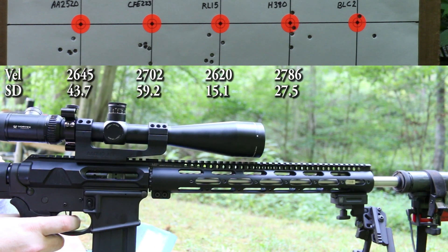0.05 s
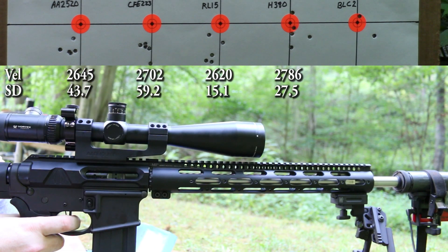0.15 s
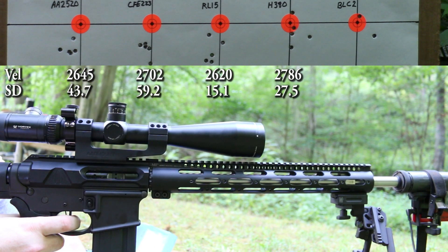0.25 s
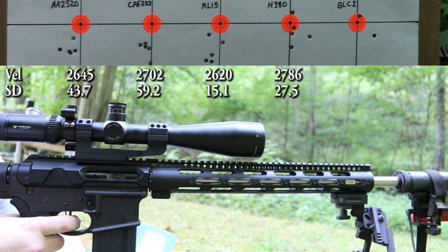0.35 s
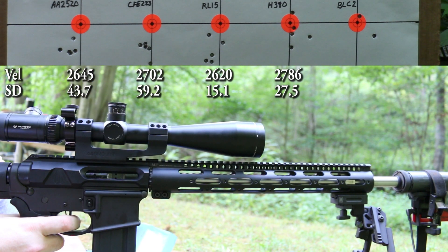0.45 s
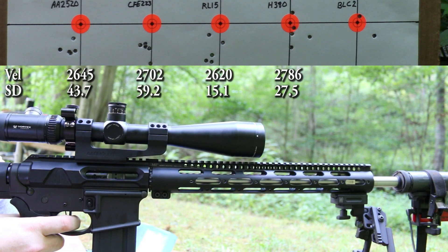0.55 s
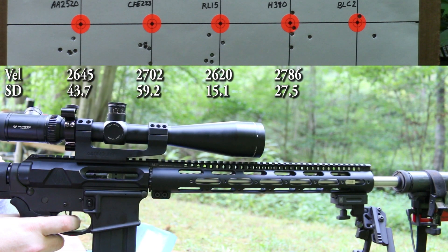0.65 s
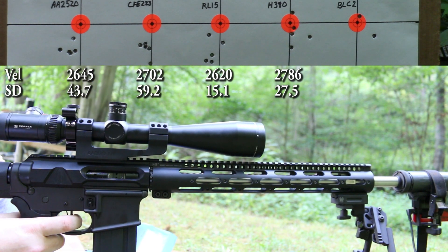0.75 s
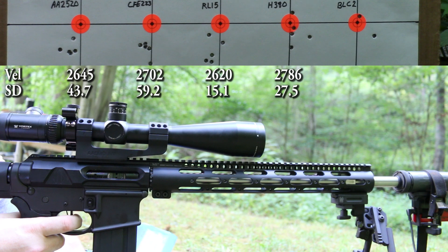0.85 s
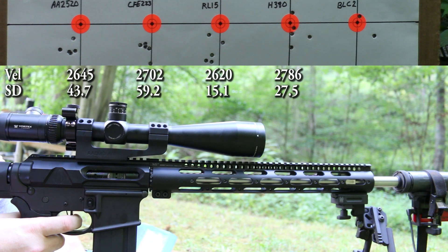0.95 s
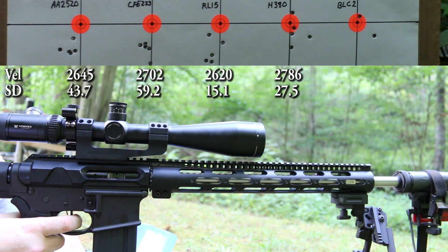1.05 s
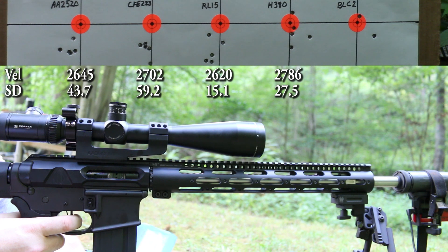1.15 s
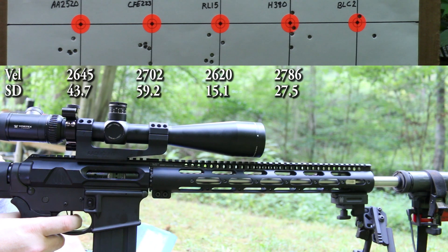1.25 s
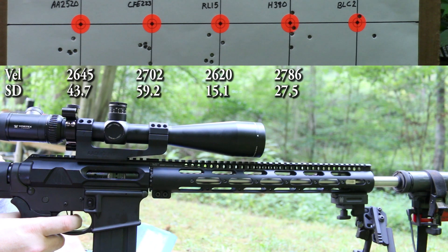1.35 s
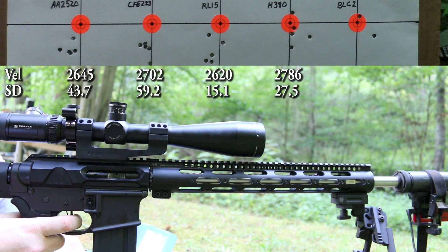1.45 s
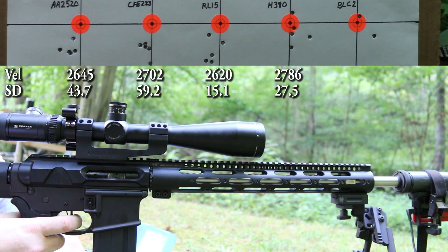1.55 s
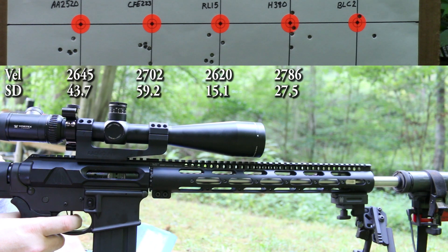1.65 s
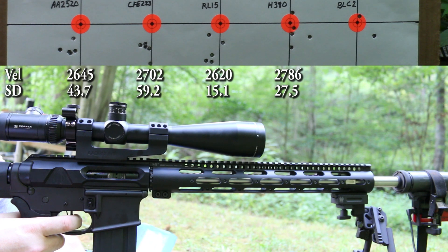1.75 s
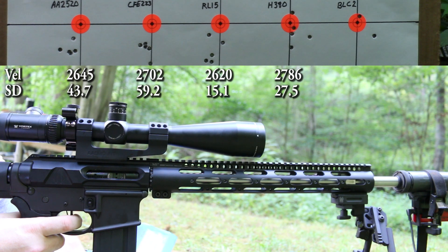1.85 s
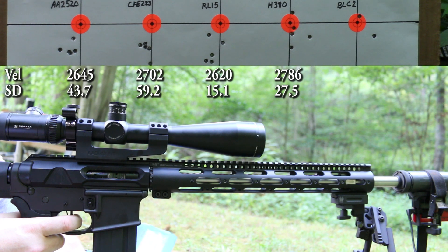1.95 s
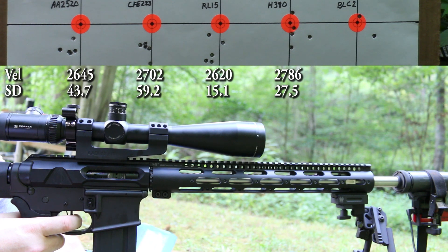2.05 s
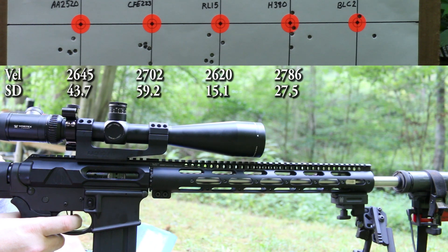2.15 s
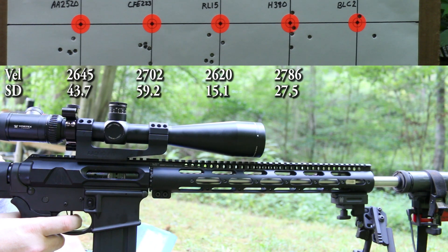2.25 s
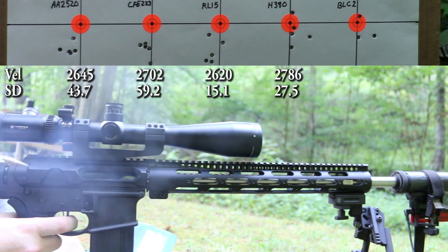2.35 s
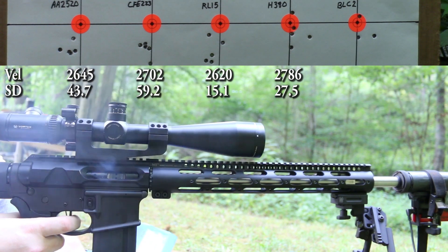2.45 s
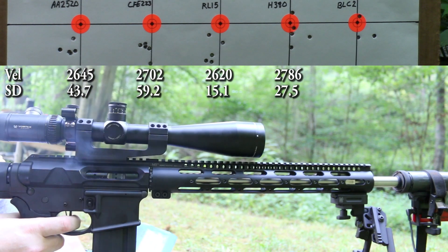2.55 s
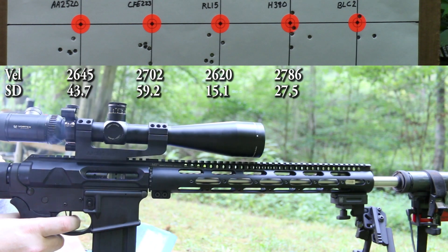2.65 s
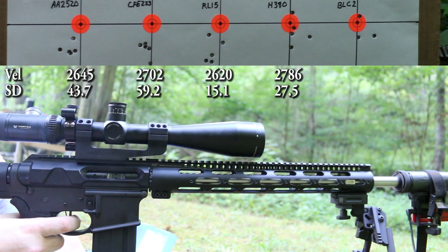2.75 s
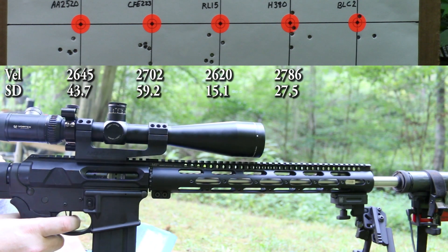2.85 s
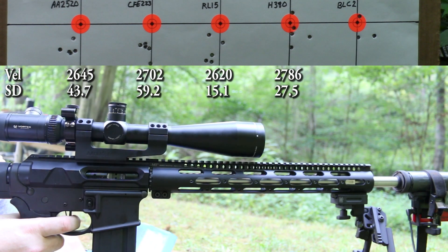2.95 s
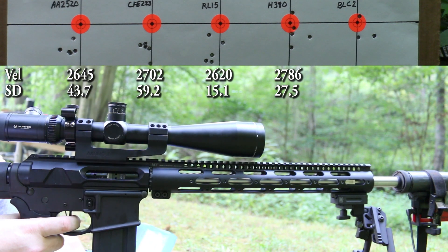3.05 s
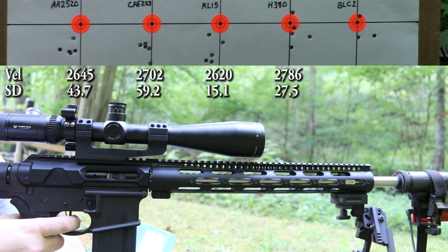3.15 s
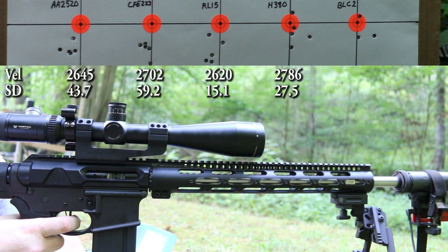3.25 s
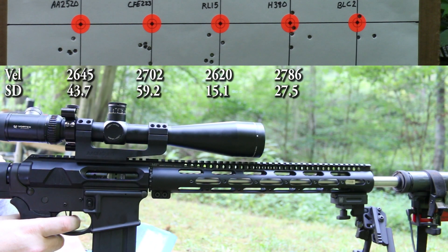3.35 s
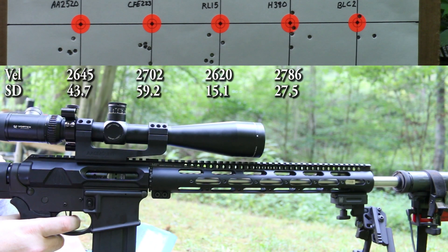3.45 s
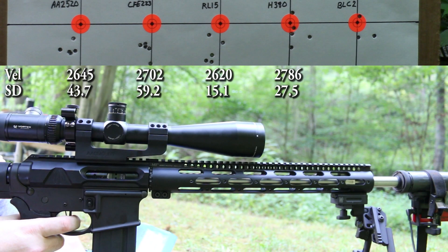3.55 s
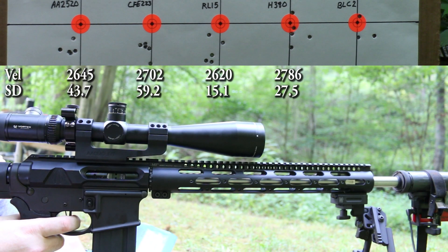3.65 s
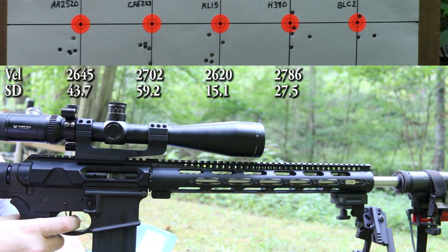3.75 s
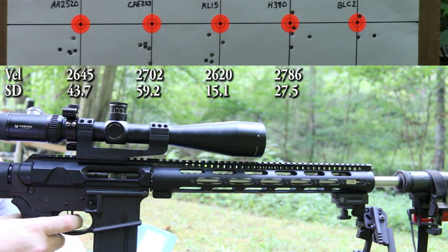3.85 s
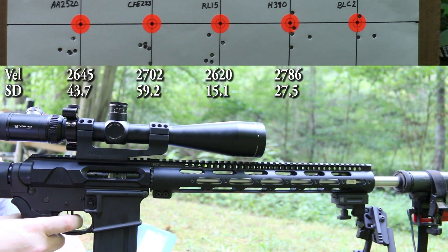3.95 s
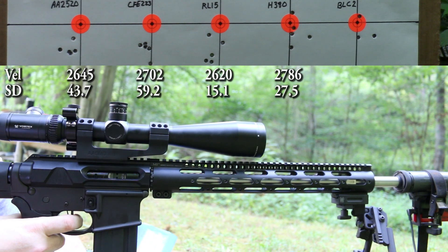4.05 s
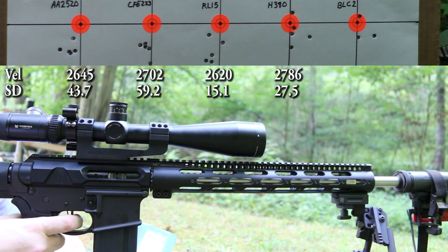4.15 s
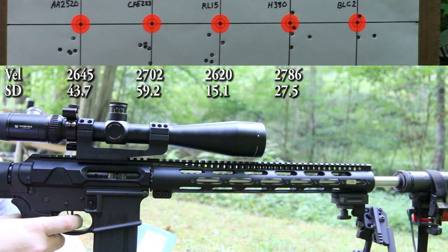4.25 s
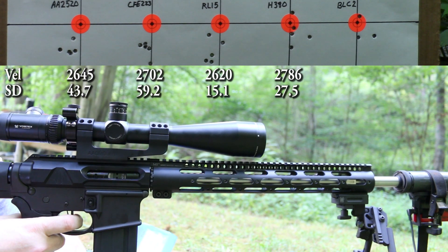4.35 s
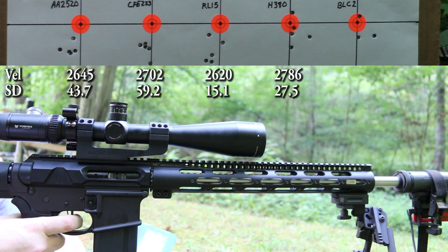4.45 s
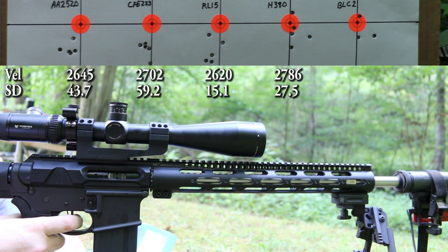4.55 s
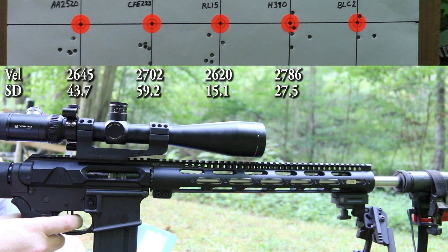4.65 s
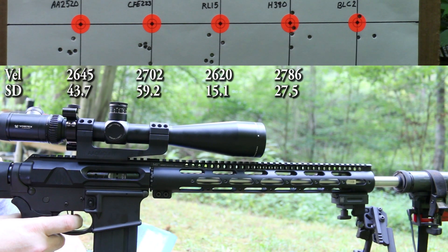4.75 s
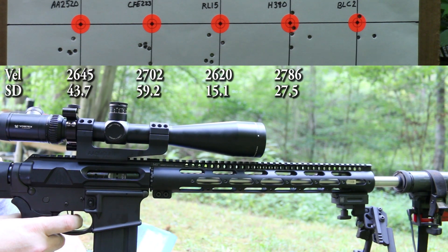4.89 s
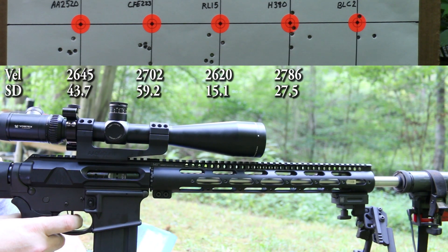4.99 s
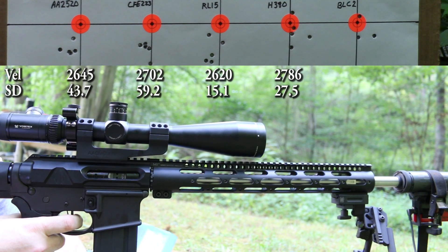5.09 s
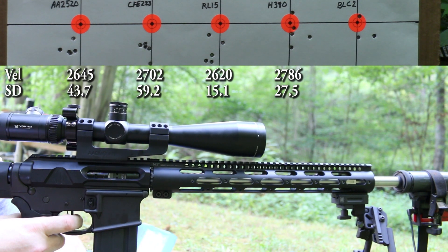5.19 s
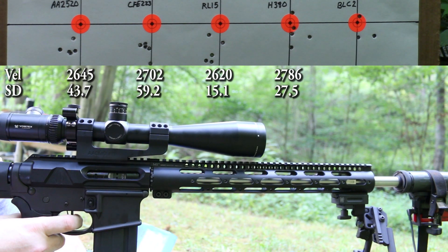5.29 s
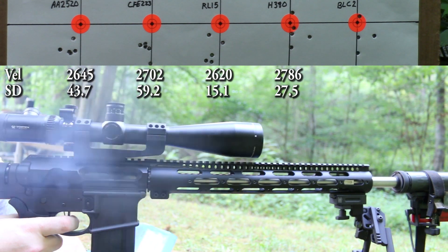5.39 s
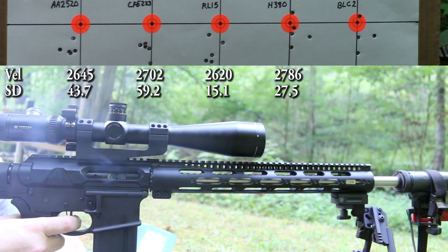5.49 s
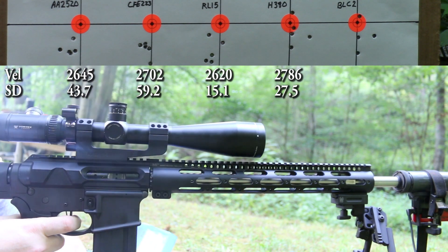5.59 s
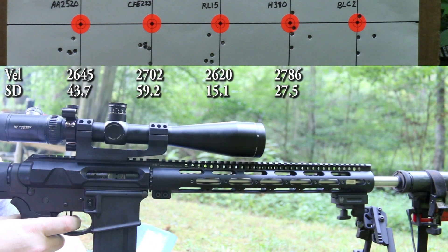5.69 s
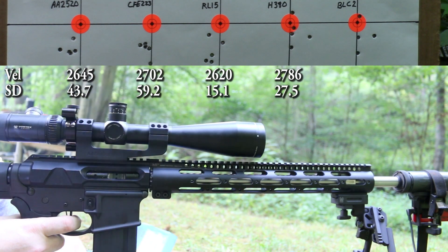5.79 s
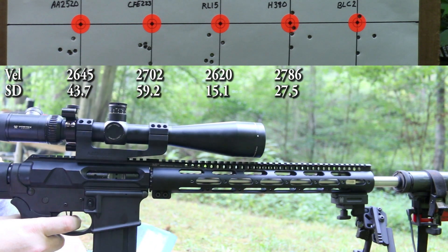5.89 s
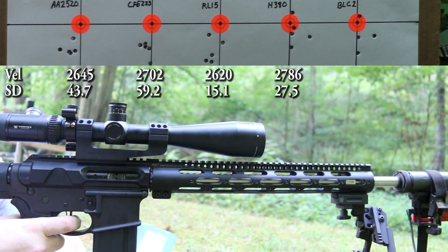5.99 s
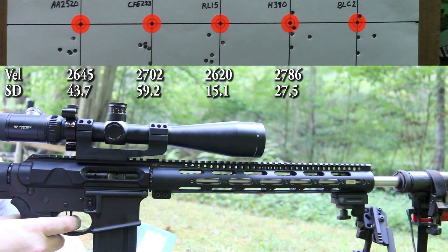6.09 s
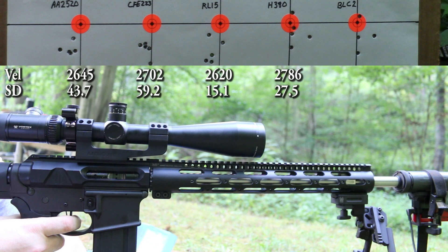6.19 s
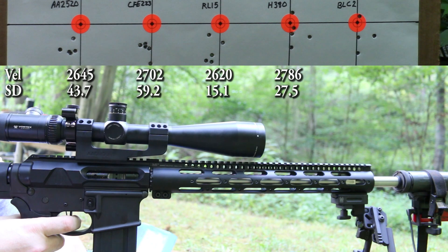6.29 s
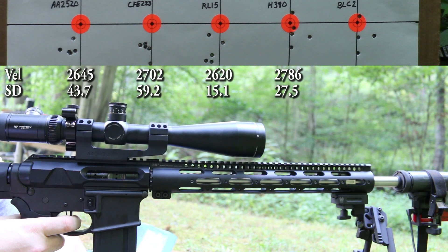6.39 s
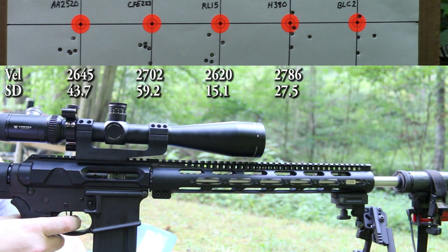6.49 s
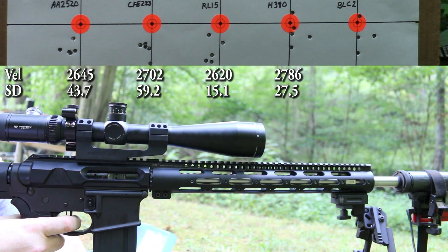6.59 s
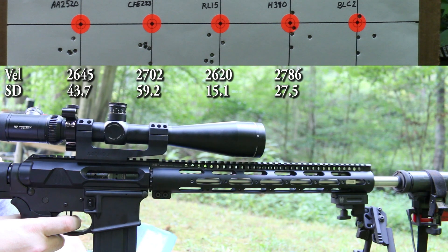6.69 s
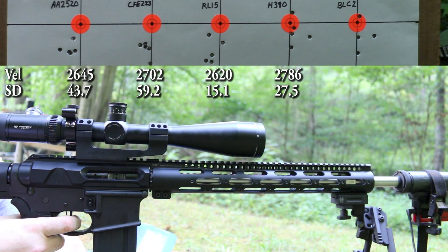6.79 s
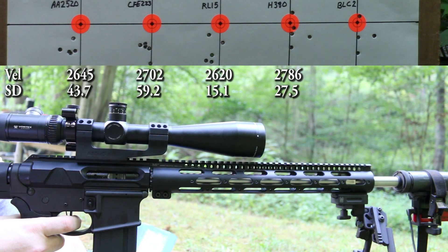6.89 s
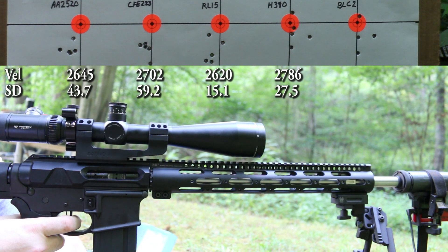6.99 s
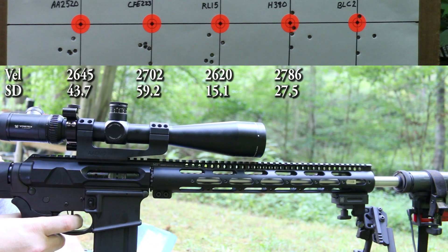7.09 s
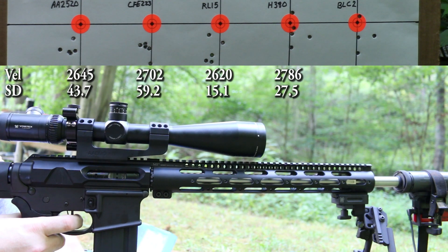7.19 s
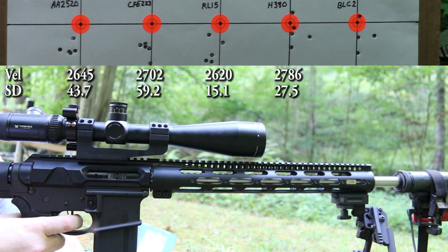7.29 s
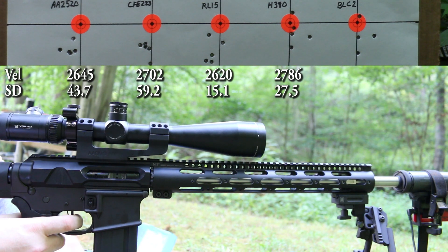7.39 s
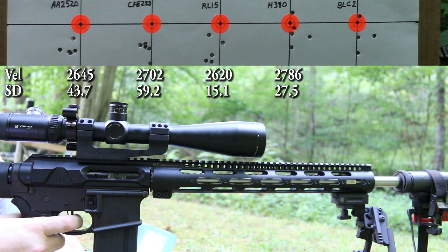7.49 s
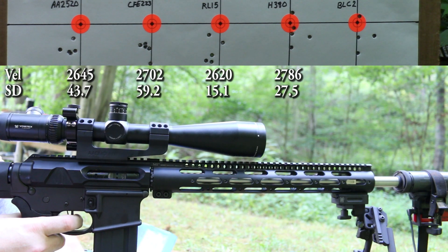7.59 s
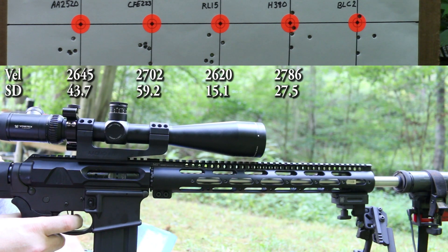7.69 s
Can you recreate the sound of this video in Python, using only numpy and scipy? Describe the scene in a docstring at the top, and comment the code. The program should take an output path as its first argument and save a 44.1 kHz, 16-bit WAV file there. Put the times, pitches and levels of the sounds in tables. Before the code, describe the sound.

The echo of an earlier shot rolls away over quiet woodland air. Then a rifle fires twice, about three seconds apart, close enough to overload the microphone. Each crack scatters through the trees in a bright, sizzling decay and comes back as a darker, distant roll before cutting off. Spent brass ticks faintly on the ground after each shot, over a thin hiss.

```python
"""Rifle shots at a woodland range

The tail of an earlier shot rolls away, then a rifle fires twice from a bench; every tail is cut dead.
The muzzle blast and its first echoes overload the microphone, the trees scatter a bright, sizzling
decay, and a far hillside rolls back darker. Spent cases tick on the ground. Underneath lie still air,
a machine's hum, a thin hiss and one faint bird whistle."""
import sys
import numpy as np
from scipy import signal
from scipy.fft import rfft, irfft, next_fast_len
from scipy.io import wavfile
from scipy.ndimage import map_coordinates

SR = 44100
rng = np.random.default_rng(int(sys.argv[2]) if len(sys.argv) > 2 else 0)


def to_wav(s):
    """Save 16-bit WAV."""
    ch = np.atleast_2d(s).T  # columns
    pcm = np.round(np.clip(ch, -1, 1) * 32767)  # PCM
    wavfile.write(sys.argv[1], SR, pcm.astype(np.int16))


N = 340893
CLOCK = np.arange(N) / SR  # scene time, s
AGE = np.arange(2 * SR) / SR  # time since a shot, s

# shots, the first fired before the scene opens: t/s, level/dB, thump trim/dB, tail cut at t/s
SHOTS = [(-1.05, 1, 0, .787), (2.3885, 0, -3, 3.922), (5.4168, 0, 1, 7.085)]
# bright spectrum of the woods' scatter, also the colour of a case's click: f/Hz, level/dB
WOODS_SPECTRUM = [(20, -76), (80, -72), (200, -66.5), (360, -59.5), (550, -67), (1000, -73), (1400, -69),
                  (1850, -69), (2600, -62), (4700, -55), (6200, -49), (7800, -55), (9500, -66),
                  (11300, -86)]


def amp(db):
    """Decibels to gain."""
    return 10 ** (np.asarray(db) / 20)


def unit(x):
    """Scale to rms 1."""
    return x / np.sqrt(np.mean(x ** 2) + 1e-20)


def along(points, hz):
    """Read (f/Hz, value) points on a log frequency axis."""
    freqs, values = np.transpose(points)
    return np.interp(np.log(hz + 1), np.log(freqs + 1), values)


def fade(t, t60):
    """Hold at 1 until t = 0, then lose 60 dB every t60 seconds."""
    return np.exp(-np.log(1000) * np.maximum(t, 0) / t60)


def filtered(x, response):
    """EQ x with a gain curve given as a function of frequency."""
    size = next_fast_len(len(x) + SR // 8, True)
    return irfft(rfft(x, size) * response(np.fft.rfftfreq(size, 1 / SR)), size)[:len(x)]


def noise(n, spectrum):
    """Noise at rms 1, coloured by (f/Hz, level/dB) points."""
    return unit(filtered(rng.standard_normal(n), lambda hz: amp(along(spectrum, hz))))


def wobble(t, rate):
    """A smooth random curve over times t, rate knots a second."""
    return map_coordinates(rng.standard_normal(int(t[-1] * rate) + 4), [t * rate])


def add(track, at_s, sound):
    """Mix a sound into the track, dropping what falls outside."""
    start = round(at_s * SR)
    part = sound[max(-start, 0):len(track) - start]
    track[max(start, 0):max(start, 0) + len(part)] += part


def scatter(spectrum, lumpy_db, rate, alike_below_hz=900):
    """Countless small echoes, a row per shot: the lows come back alike each time, the highs vary."""
    hz = np.fft.rfftfreq(len(AGE), 1 / SR)
    lumps = unit(amp(lumpy_db * wobble(AGE, rate)))  # some trunks answer louder than others
    waves = rfft(rng.standard_normal((len(SHOTS), len(AGE))) * lumps)
    waves = np.where(hz < alike_below_hz, waves[0], waves)
    return irfft(waves * amp(along(spectrum, hz))) * np.sqrt(SR / 2)


def absorbed(x, t60s, start_s):
    """Air and leaves soak up each frequency at its own speed from start_s on."""
    hz, t, bands = signal.stft(x, SR, nperseg=512)
    decay = fade(t - start_s, along(t60s, hz)[:, None])
    return signal.istft(bands * decay, SR)[1][:, :len(AGE)]


def woods(rise_s=.03):
    """The trees scatter each shot into a bright, sizzling tail."""
    # decay among the trees: f/Hz, t60/s
    t60s = [(60, 1.7), (350, 2.2), (1500, 2), (3200, 1.45), (6200, 1.23), (9500, 1.05), (14000, .85)]
    tail = absorbed(scatter(WOODS_SPECTRUM, lumpy_db=1, rate=200), t60s, 0)
    return tail * (1 - np.exp(-AGE / rise_s))


def hillside(delay_s=.6, rise_s=.07):
    """A far slope sends each shot back as a late, dark roll."""
    # colour of the roll: f/Hz, level/dB
    spectrum = [(30, -106), (100, -99), (180, -86), (300, -77), (430, -75), (700, -79.5), (1100, -85),
                (1400, -79), (1800, -86.5), (3500, -94), (7000, -114), (10000, -145)]
    # decay of the roll: f/Hz, t60/s
    t60s = [(100, 4.5), (330, 3.8), (550, 2.8), (1400, 2.4), (4000, 1.8)]
    swell = (1 + np.tanh((AGE - delay_s) / rise_s + 1)) / 2
    return absorbed(scatter(spectrum, lumpy_db=2.2, rate=170), t60s, delay_s) * swell


def still_air(db=-78.5):
    """A soft, bass-heavy bed of outdoor air."""
    # colour of the air: f/Hz, relative level/dB
    spectrum = [(15, -2), (35, -3), (70, -9), (130, -17), (320, -16), (600, -25), (1200, -33), (4000, -39),
                (6000, -60)]
    return amp(db) * noise(N, spectrum)


def machine_hum(waver_db=2.5):
    """A far machine drones on wavering low tones, cut off with the second shot's tail."""
    # hum tones: f/Hz, level/dB
    tones = [(70, -89), (118, -87.5), (139, -93)]
    hum = sum(amp(db + waver_db * wobble(CLOCK, 5)) * unit(np.sin(2 * np.pi * hz * CLOCK))
              for hz, db in tones)
    return hum * (CLOCK < SHOTS[1][-1])


def microphone_hiss(db=-69):
    """The microphone adds a thin, narrow band of hiss."""
    # hiss band: f/Hz, relative level/dB
    spectrum = [(4000, -41), (5400, -34), (6100, -10), (6600, -3), (7500, 0), (8000, -4), (8500, -35),
                (15000, -48)]
    return amp(db) * noise(N, spectrum)


def bird(waver_hz=20, flutter_db=3, swell_db=5, attack_s=.03, release_t60=.35,
         wet_db=-3, forest_t60=1.1, ease=.87):
    """One unsteady far whistle glides up, swells and levels out, smeared by the trees."""
    # the call: t/s, length/s, first f/Hz, last f/Hz, level/dB at the top of the glide
    call = (.8, .42, 3480, 4270, -87)
    start, length, first_hz, last_hz, db = call
    t = CLOCK - start
    climb = np.sin(np.pi / 2 * np.clip(t / length, 0, 1) ** ease) ** 2
    pitch = first_hz + (last_hz - first_hz) * climb + waver_hz * wobble(CLOCK, 90)
    envelope = np.clip(t / attack_s, 0, 1) * fade(t - length, release_t60)
    level = envelope * amp(db - swell_db * (1 - climb) + flutter_db * wobble(CLOCK, 30))
    whistle = level * np.sin(2 * np.pi * np.cumsum(pitch) / SR)
    trees = rng.standard_normal(SR) * fade(AGE[:SR], forest_t60)
    reverb = signal.fftconvolve(whistle, trees / np.linalg.norm(trees))[:N]
    return whistle + amp(wet_db) * reverb


def arrivals(count=6, first_gap_s=.000955, ground_lag_s=.0016, ground_db=-4.5):
    """The blast bounces between muzzle, bench and shelter, then returns as distinct echoes."""
    # echoes, shelter roof to hillside: delay/s, pulse level/dB, pulse length/s, crack level/dB
    echoes = [(.0137, 9.6, .00042, -17), (.0375, -6, .00025, -22), (.0912, -7, .00025, -6),
              (.7, -34, .0006, -63)]
    bounce = np.arange(count)  # 0 is the direct blast; each bounce is weaker and longer
    gaps = first_gap_s * 1.42 ** bounce
    pulse_dbs = 8.4 - .25 * bounce
    lengths = .00017 * 1.16 ** bounce
    crack_dbs = -7 - .1 * bounce
    bounces = zip(np.cumsum(gaps) - gaps, pulse_dbs, lengths, crack_dbs)
    off_ground = [(delay + ground_lag_s, pulse_db + ground_db, length, crack_db + ground_db)
                  for delay, pulse_db, length, crack_db in echoes]
    return [*bounces, *echoes, *off_ground]


def muzzle_blast(crack_t60=.06, bluntness=.25):
    """Each arrival of the pressure pulse shakes the bench and trails a bright crack."""
    # ringing modes of the bench and its shelter: f/Hz, level/dB, t60/s
    bench_modes = [(115, -38, .12), (215, -31, .06), (370, -29, .05), (425, -19, .045), (530, -20, .025),
                   (980, -18.5, .012), (1400, -20, .014)]
    # colour of the crack: f/Hz, relative level/dB
    crack_spectrum = [(200, -22), (1000, -10), (2200, -15), (4500, -9), (6500, 2), (7600, -4), (10000, -22),
                      (15000, -36)]
    out = np.zeros(len(AGE))
    t = AGE[:SR // 6]
    ring = sum(amp(db) * np.sin(2 * np.pi * hz * t) * fade(t, t60) for hz, db, t60 in bench_modes)
    for delay, pulse_db, length, crack_db in arrivals():
        progress = t / length
        pulse = (1 - progress) * np.exp(-progress)  # sudden overpressure, then longer suction
        rounding = progress * np.exp(-progress / bluntness)  # longer pulses have blunter fronts
        pulse = signal.fftconvolve(pulse, rounding / rounding.sum())[:len(t)]
        crack = noise(len(t), crack_spectrum) * fade(t, crack_t60)
        add(out, delay, amp(pulse_db) * (pulse + ring) + amp(crack_db) * crack)
    return out


def near_scatter(hold_s=.058, t60=.45):
    """Bench, ground and nearest trunks answer at once with a dense splash."""
    # colour of the splash: f/Hz, level/dB
    spectrum = [(20, -63), (70, -65), (115, -60), (160, -62), (260, -57), (380, -50), (600, -59),
                (1000, -63.5), (2000, -63), (4500, -51.5), (6200, -44), (7800, -51), (10000, -67),
                (11500, -80)]
    return scatter(spectrum, lumpy_db=1.5, rate=160) * fade(AGE - hold_s, t60)


def low_thump(db=-10, hz=28, t60=.11, delay_s=.008):
    """One slow, sub-bass push and pull under each shot."""
    t = np.maximum(AGE - delay_s, 0)
    return amp(db) * np.sin(2 * np.pi * hz * t) * fade(t, t60)


def rifle():
    """Each shot layers blast, thump and outdoor tail, and ends on a hard cut."""
    out = np.zeros(N)
    tails = near_scatter() + woods() + hillside()
    for (start, db, thump_db, cut), tail in zip(SHOTS, tails):
        shot = muzzle_blast() + amp(thump_db) * low_thump() + tail
        add(out, start, amp(db) * shot * (AGE < cut - start))
    return out


def spent_cases(click_db=-6, click_t60=.02, contact_s=.001):
    """Ejected brass lands on soft ground with a click and a short ring."""
    # landings: t/s, level/dB
    landings = [(2.926, -39), (3.021, -38), (6.035, -30)]
    # ringing modes of a case: f/Hz, level/dB, t60/s
    brass_modes = [(6150, -3, .04), (6650, -2, .035), (7500, -9, .03), (13300, -45, .08)]
    out = np.zeros(N)
    t = AGE[:SR // 4]
    attack = 1 - np.exp(-t / contact_s)
    for start, db in landings:
        ring = sum(amp(mode_db + rng.normal(0, 2)) * np.sin(2 * np.pi * hz * t) * fade(t, t60)
                   for hz, mode_db, t60 in brass_modes)
        click = noise(len(t), WOODS_SPECTRUM) * fade(t, click_t60)
        add(out, start, amp(db) * (ring + amp(click_db) * click) * attack)
    return out


def scene():
    """Rifle, brass and bird over the quiet bed, in mono."""
    return (rifle() + spent_cases() + bird() + still_air() + machine_hum() + microphone_hiss())[None]


def record(dry, ceiling=.51, hardness=6, top_hz=15750):
    """The overloaded input flattens the blast's peaks; a steep low-pass shaves off the top."""
    clipped = dry[0] / (1 + np.abs(dry[0] / ceiling) ** hardness) ** (1 / hardness)
    return filtered(clipped, lambda hz: 1 / (1 + (hz / top_hz) ** 120))[None]


dry = scene()
out = record(dry)
to_wav(out)
```